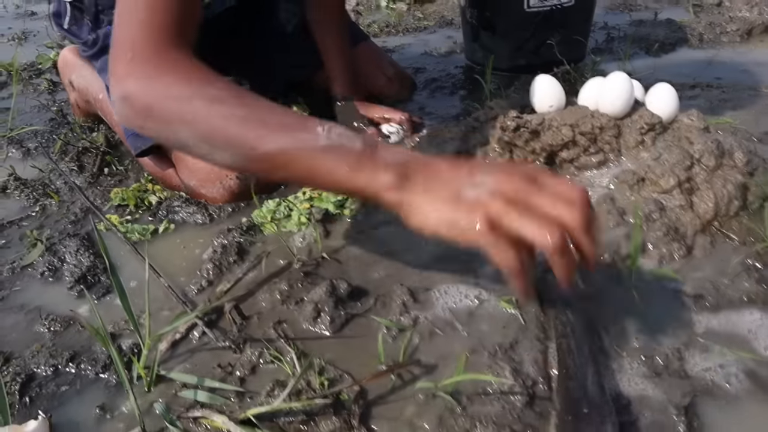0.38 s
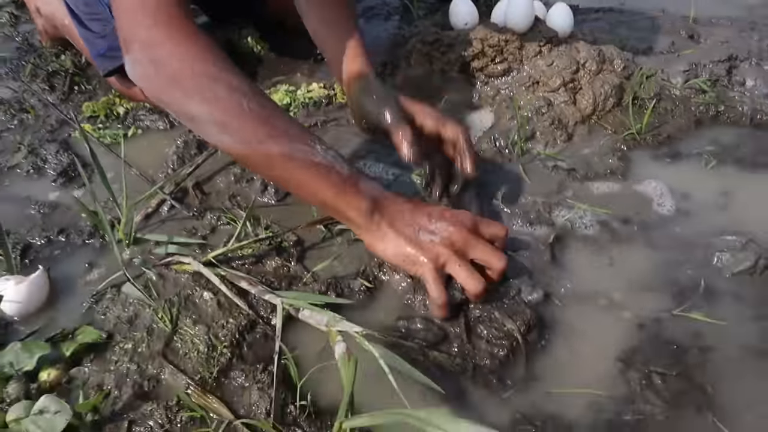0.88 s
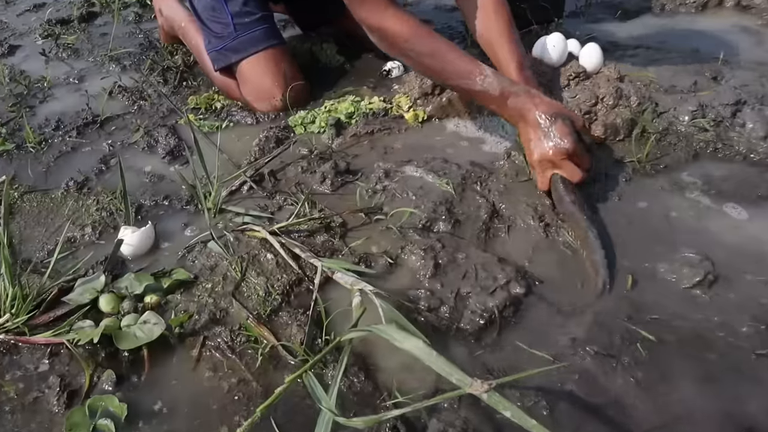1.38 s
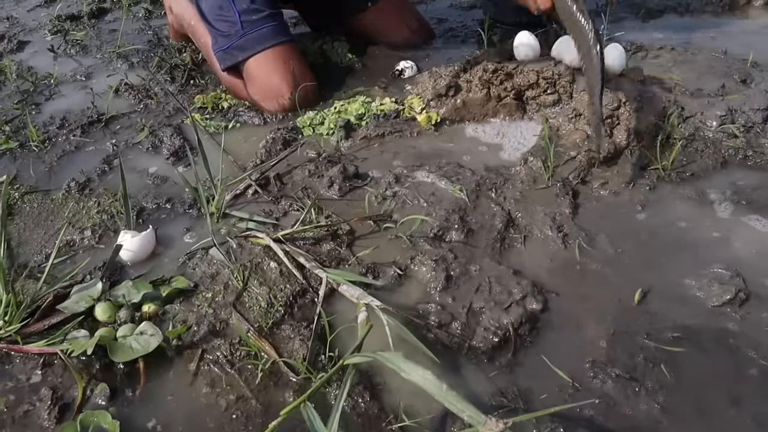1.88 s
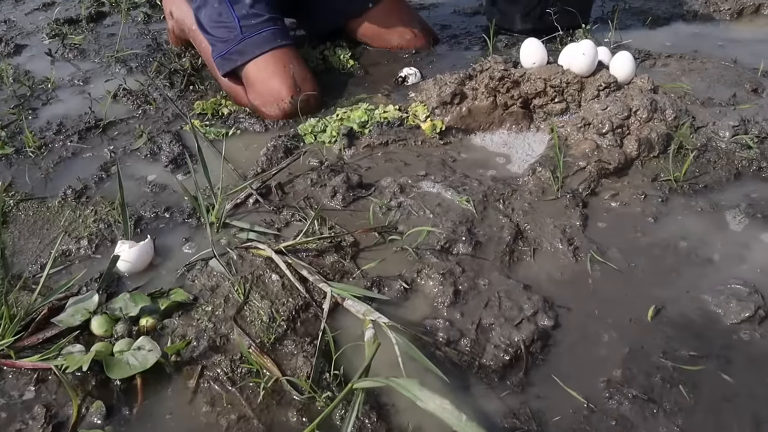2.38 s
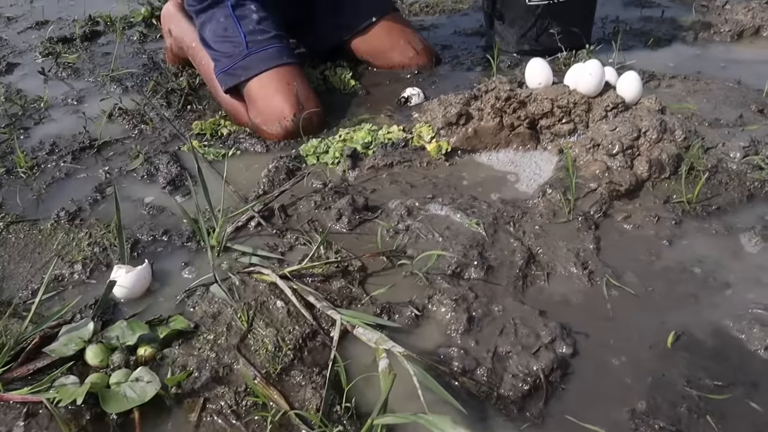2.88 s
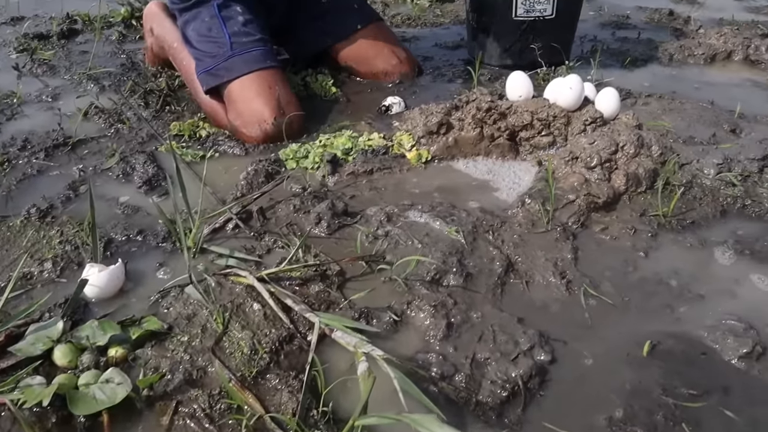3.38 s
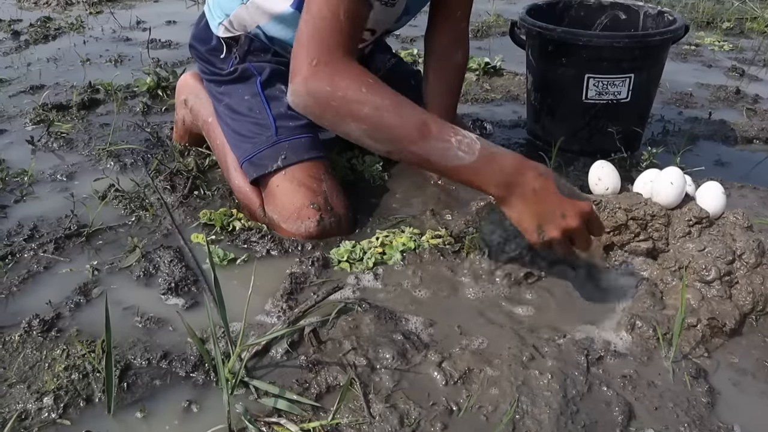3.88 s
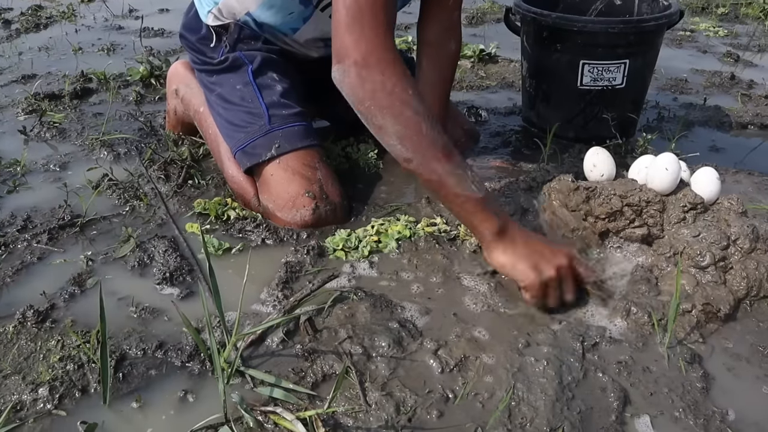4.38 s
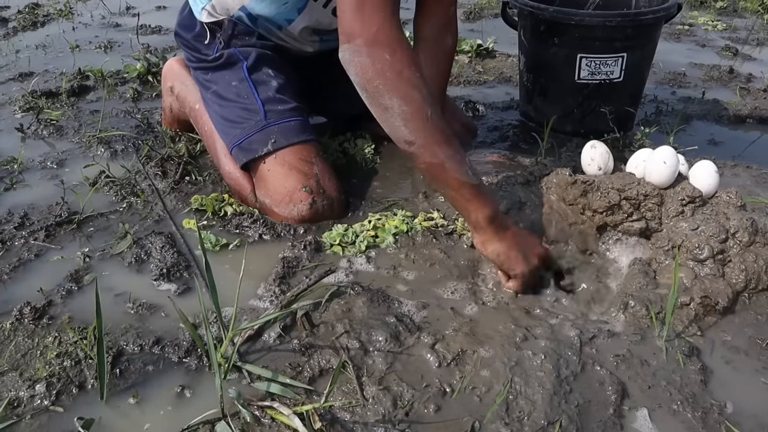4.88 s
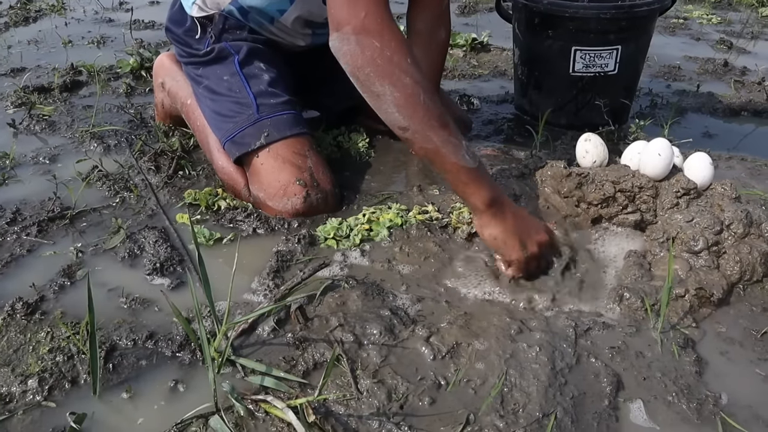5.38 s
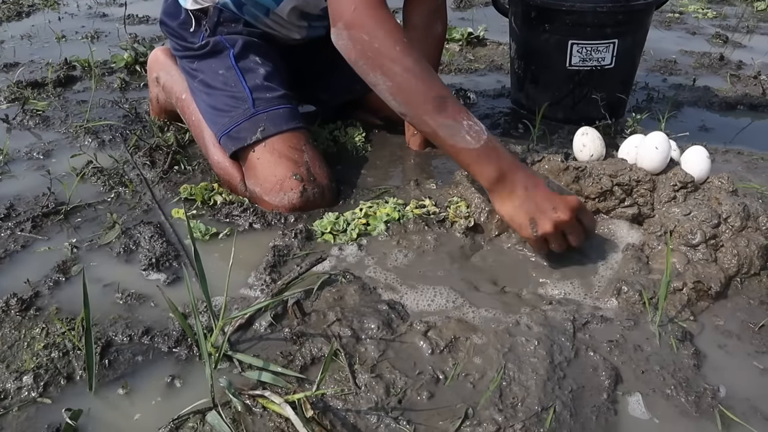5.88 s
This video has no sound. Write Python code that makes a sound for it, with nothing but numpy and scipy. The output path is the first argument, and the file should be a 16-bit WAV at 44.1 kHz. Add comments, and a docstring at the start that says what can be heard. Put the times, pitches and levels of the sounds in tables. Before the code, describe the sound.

Busy wet smacks and splashes for about a second and a half, then near quiet with soft low wind buffeting. Around three seconds, heavy dull thumps ring a plastic pail with wet slaps. From nearly four seconds, slower rhythmic stirring brings bubbling plops and squelchy slaps. Open field, dry, close microphone, wide splash treble, faint hiss and drone.

```python
"""Water and mud splash as a hand grabs a slippery fish, drops it in a bucket and stirs a water-filled hole.
The water is crowds of tiny ringing bubbles plus flickering noise; each smack is a noise burst ringing a cavity.
Trapped air gulps as rising sines, the bucket rings in several modes, and a few thin whistles glide.
Low noise makes the wind on the microphone, with a few thuds, a faint far drone and an open-field hiss.
The two microphone ports are spread wide in the treble."""
import sys
import numpy as np
from scipy import signal
from scipy.fft import rfft, irfft
from scipy.io import wavfile

SR = 44100
rng = np.random.default_rng(int(sys.argv[2]) if len(sys.argv) > 2 else 0)


def put_to_file(sound):
    """Save the sound as 16-bit audio at rate SR, in the file named by the first command-line argument."""
    columns = np.atleast_2d(sound).T  # one column per channel
    safe = np.clip(columns, -1, 1)
    whole_steps = np.round(safe * 32767)
    wavfile.write(sys.argv[1], SR, whole_steps.astype(np.int16))


def attenuation_scalar(level_db):
    """Turn a level in dB into a linear amplitude multiplier (20 dB per decade)."""
    decades = np.asarray(level_db, float) / 20
    return 10 ** decades


N = 264600   # six seconds of samples
FREQS = np.maximum(np.fft.rfftfreq(N, 1 / SR), 1)


def rms_one(x):
    """Scale to an average strength (rms) of 1."""
    return x / np.sqrt(np.mean(x ** 2) + 1e-20)


def in_time(rows):
    """Turn table columns into signals, joined by straight lines and held outside the table."""
    s, *columns = np.transpose(rows)
    return np.array([np.interp(np.arange(N) / SR, s, c) for c in columns])


def at_hz(points):
    """Read a table over frequency at every bin of the spectrum."""
    hz, value = np.transpose(points)
    return np.interp(np.log(FREQS), np.log(hz), value)


def band(x, low_hz, high_hz, count=1):
    """Keep a band of pitches with a Butterworth filter, applied count times."""
    edges = [low_hz, min(high_hz, .45 * SR)]
    sections = signal.butter(2, edges, "band", fs=SR, output="sos")
    return signal.sosfilt(np.tile(sections, (count, 1)), x)


def lowpass(x, order, top_hz):
    """Take away the treble above top_hz."""
    return signal.sosfilt(signal.butter(order, top_hz, fs=SR, output="sos"), x)


def drift(rate):
    """Slow random wandering with a spread of 1; a higher rate (Hz) wanders faster."""
    # smooth noise is made at every 40th sample, then filled in
    r = np.exp(-80 * np.pi * rate / SR)
    slow = signal.lfilter([1], [1, -2 * r, r * r], rng.standard_normal(N // 40 + 2002))[2000:]
    return np.interp(np.arange(N) / 40, np.arange(len(slow)), rms_one(slow))


def ring(x, hz, t60):
    """A resonance: a unit click sets a sine of height 1 ringing, down 60 dB after t60 seconds."""
    r = attenuation_scalar(-60 / (t60 * SR))
    w = 2 * np.pi * min(hz, .45 * SR) / SR
    return signal.lfilter([0, np.sin(w)], [1, -2 * r * np.cos(w), r * r], x + 1e-18)


def add(out, s, sound):
    """Mix a short sound in at time s."""
    i = round(s * SR)
    out[i:i + len(sound)] += sound[:N - i]


def coloured(spectrum):
    """Steady noise of a given spectrum, rms 1."""
    return rms_one(irfft(rfft(rng.standard_normal(N)) * attenuation_scalar(at_hz(spectrum)), N))


# spectra of the open-air hiss, shared and opposite in the ports: (pitch [Hz], relative level per Hz [dB])
FIELD_SHARED = [(88, -10.5), (150, -14.5), (244, -12.5), (504, -10.5), (1240, -19), (1940, -18.5),
                (8230, -34.5), (11300, -31), (12700, -31), (16000, -110)]
FIELD_OPPOSITE = [(18, -99), (30, -77), (75, -64), (194, -4), (666, -2.5), (2610, -6), (6210, -16.5),
                  (11400, -14.5), (14000, -20), (16000, -80)]


def field():
    """Open-air hiss, mid and side: coloured noise whose treble comes and goes."""
    mid = attenuation_scalar(-54 + 0.47 * drift(1.8)) * coloured(FIELD_SHARED)
    side = attenuation_scalar(-50.5 + 2.4 * drift(1.5)) * coloured(FIELD_OPPOSITE)
    hiss = np.array([mid, side])
    treble_gain = attenuation_scalar(2.5 * drift(5) - 1.2)
    return hiss + (treble_gain - 1) * band(hiss, 4000, 15000)


def drone():
    """A faint far drone, perhaps a pump: a narrow band of noise that wavers slowly."""
    noise = band(rng.standard_normal(N), 115, 141)
    return attenuation_scalar(-60 + 1.5 * drift(1.5)) * rms_one(noise)


# strength of the wind on the ports: (time [s], level [dB], buffeting relative to level [dB])
WIND_GUSTS = [(0.0, -43, -10), (1.12, -39, -13), (1.22, -54, -7), (1.37, -35.5, -13), (1.52, -40.5, 5.5),
              (1.57, -57, 6), (1.74, -42, -18), (1.9, -55, -1), (2.19, -51.5, -3.5), (2.26, -39, -11.5),
              (2.57, -58, -0.5), (2.87, -41, -18), (3.0, -57, 6), (3.51, -45, 3), (3.61, -47, -12),
              (3.88, -41.5, -12), (3.94, -55.5, -0.5), (4.21, -40.5, -15), (4.3, -47, -8),
              (5.4, -44.5, -12), (6.0, -48.5, -7)]
# colour of its low rumble: (pitch [Hz], relative level per Hz [dB])
WIND_SPECTRUM = [(12, -94), (20, -51), (29, 4), (55, 23.5), (75, 23.5), (110, 21), (140, 7), (240, -120)]


def wind():
    """Air tumbling over the ports: lumpy low noise, plus buffeting about an octave higher."""
    level_db, buffet_db = in_time(WIND_GUSTS)
    rumble = attenuation_scalar(level_db + 1.6 * drift(13)) * coloured(WIND_SPECTRUM)
    buffet = rms_one(band(band(rng.standard_normal(N), 92, 225), 83, 215))
    return rumble + attenuation_scalar(level_db + buffet_db + 1.2 * drift(9.9)) * buffet


# gain of the wind that differs between the ports: (time [s], level [dB])
WIND_DIFFERENCE = [(0, -16), (1.2, -12), (1.5, 2), (1.6, -48), (3.6, -42), (3.8, -12), (6, -15)]


def wind_apart():
    """The part of the wind that differs between the ports: a fresh draw, without the lowest rumble."""
    gain_db, = in_time(WIND_DIFFERENCE)
    return attenuation_scalar(gain_db) * band(wind(), 83, 400)


# low thuds at the end of a gust: (time [s], level before the soft onset [dB], pitch [Hz], 60 dB fall [s])
GUST_THUDS = [(1.489, -27, 130, 0.071), (1.496, -25, 200, 0.055), (1.514, -31, 260, 0.039)]


def thuds():
    """Short dull rings: low sines with a soft start that die away."""
    out, t = np.zeros(N), np.arange(6000) / SR
    for s, db, hz, t60 in GUST_THUDS:
        onset = 1 - np.exp(-t / 0.0023)
        add(out, s, attenuation_scalar(db - 60 * t / t60) * onset * np.sin(2 * np.pi * hz * t))
    return out


# thin whistles: (start [s], end [s], first pitch [Hz], last pitch [Hz], level [dB])
THIN_WHISTLES = [(0.749, 0.817, 4130, 4280, -45.5), (0.866, 0.903, 3950, 3880, -42.5),
                 (0.898, 0.938, 1960, 2090, -47)]


def whistles():
    """Short gliding sines with soft ends."""
    out = np.zeros(N)
    for start, end, first_hz, last_hz, db in THIN_WHISTLES:
        size = round((end - start) * SR)
        turns = np.cumsum(np.linspace(first_hz, last_hz, size)) / SR
        add(out, start, attenuation_scalar(db) * signal.windows.tukey(size, .5) * np.sin(2 * np.pi * turns))
    return out


# fish against the bucket: (time [s], peak level [dB], hardness [Hz], signed drive of the twin mode [ratio],
# share of the free ring time [ratio])
FISH_THUMPS = [(2.814, -35, 400, 0.52, 0.53), (2.946, -5.5, 636, 0.11, 0.85),
               (3.149, -24, 406, -0.57, 0.31), (3.3655, -8, 238, -1.23, 1.0),
               (3.484, -17.5, 900, 0.12, 0.26), (3.4886, -19, 120, -.3, 0.27),
               (3.498, -20.5, 250, 0.53, 0.33), (3.558, -27.5, 603, -0.68, 0.26)]
# ways the bucket wall rings: (pitch [Hz], level of drive [dB], free 60 dB fall [s])
WALL_MODES = [(140, -13.5, 0.087), (295, -0.5, 0.13), (600, -16, 0.089), (678, -5, 0.085), (960, -7, 0.09),
              (1400, 0, .03), (1990, -18, .03)]
TWIN_HZ, TWIN_T60_S = 333.5, 0.097   # a close second mode that beats against the main one
SCUFF_DB, SCUFF_T60_S = -18, .04   # rough contact of the wet body on the wall, relative to the push


def bucket():
    """Soft blows, each a rounded push, set the wall modes ringing; a body left lying on the wall damps them."""
    out, t = np.zeros(N), np.arange(8000) / SR
    for s, db, hardness_hz, twin, free in FISH_THUMPS:
        push = t * np.exp(-2 * np.pi * hardness_hz * t)
        scuff = attenuation_scalar(SCUFF_DB - 60 * t / SCUFF_T60_S) * rng.standard_normal(len(t))
        blow = push / push.max() + scuff
        wall = sum(attenuation_scalar(level_db) * ring(blow, hz, free * t60) for hz, level_db, t60 in WALL_MODES)
        wall = wall + twin * ring(blow, TWIN_HZ, free * TWIN_T60_S)
        wall = band(wall, 157, 7300)
        add(out, s, attenuation_scalar(db) * wall / np.abs(wall).max())
    return out


WASH_DB, WASH_LINGER_S, WASH_PATCHY_DB = -13, .012, 4.0   # relative to fizz, time constant, flicker
WASH_EDGES_HZ = [800, 1300, 2100, 3300, 5200]


def wash(fizz):
    """Sheets of water running back: noise that lingers after the surge, each band flickering on its own."""
    r = np.exp(-1 / (WASH_LINGER_S * SR))
    flow = signal.lfilter([1 - r], [1, -r], fizz)
    white = rng.standard_normal((2, N))
    sheets = 0
    for k, (low_hz, high_hz) in enumerate(zip(WASH_EDGES_HZ, WASH_EDGES_HZ[1:])):
        flicker = attenuation_scalar(WASH_PATCHY_DB * drift(35) - 1.5 * k)   # higher bands are weaker
        sheets = sheets + rms_one(band(white[k % 2], low_hz, high_hz)) * flicker
    return attenuation_scalar(WASH_DB) * flow * rms_one(sheets)


def at_random(fizz, top_db, range_db, low_hz, high_hz, count):
    """Times, levels from top_db over the fizz down by range_db, pitches, and a spare draw from 0 to 1."""
    when, size, pitch, spare = rng.random((count, 4)).T
    s = when * (N - 200) / SR
    fizz_db = 20 * np.log10(fizz[(s * SR).astype(int)])
    return s + .002, fizz_db + top_db - range_db * size, low_hz * (high_hz / low_hz) ** pitch, spare


def blips(fizz):
    """Rows of lesser gulps: small pockets that close at random, as strong as the fizz of the moment allows."""
    s, db, hz, climb = at_random(fizz, top_db=13.5, range_db=10, low_hz=1200, high_hz=4200, count=260)
    return list(zip(s, db, hz, 70 / hz, 28 * climb))   # 70 cycles rung, rising up to 28 octaves per s


# air pockets that ring as they close: (time [s], level before onset and flutter [dB], early pitch [Hz],
# 60 dB fall [s], rise [octaves per s])
AIR_GULPS = [(.094, -22.5, 1064, .082, 11), (.128, -20, 800, .025, 6), (.138, -16, 1035, .023, 7),
             (.154, -17, 858, .06, 0), (.171, -6, 520, .025, 7), (.186, -10, 493, .02, 10),
             (.293, -16, 1457, .043, 7), (.304, -20, 680, .025, 6), (.345, -30, 420, .09, 6),
             (.388, -16, 990, .047, 9), (.6, -17, 500, .015, 10), (.637, -14.5, 648, .033, 6),
             (1.168, -15, 510, .027, 7), (1.209, -8, 680, .02, 7), (1.257, -14.5, 1700, .042, 7),
             (1.286, -20, 700, .04, 4), (1.324, -24, 620, .03, 6), (1.392, -16, 1865, .024, 4),
             (3.829, -20, 820, .04, 3), (3.897, -26, 1450, .04, 5), (3.929, -19, 2200, .03, 2),
             (3.957, -28, 950, .03, 5), (3.854, -12.5, 746, .033, 5), (3.909, -40, 700, .12, 13),
             (3.929, -33, 931, .11, 8), (3.969, -30.5, 918, .088, 8.5), (4.237, -23, 1400, .021, 15.5),
             (4.267, -36, 900, .083, 12), (4.285, -33, 1300, .08, 10), (4.335, -44, 1150, .15, 18),
             (4.454, -20.5, 1340, .042, 8), (4.467, -16.5, 941, .06, 13), (4.528, -28, 1850, .04, 4),
             (4.567, -24, 1500, .043, 20), (4.584, -22, 1800, .03, 6), (4.617, -27, 3400, .03, 2),
             (4.658, -30, 950, .05, 15), (4.753, -12, 950, .022, 7), (4.971, -22, 1000, .03, 8),
             (5.044, -29, 544, .08, 14), (5.077, -12, 1705, .035, 15), (5.078, -25, 2300, .02, 15),
             (5.504, -13, 1356, .026, 12), (5.516, -21, 527, .074, 6), (5.549, -29, 1150, .11, 22),
             (5.599, -34, 1560, .065, 4.4), (5.679, -37, 1300, .07, 9), (5.867, -18.5, 844, .06, 4),
             (5.884, -15.5, 1083, .029, 10), (5.918, -32, 650, .03, 12), (5.942, -22, 640, .095, 24),
             (5.957, -32, 2050, .04, 5)]
GULP_WAVER, GULP_FLUTTER_DB = .016, 1.5   # unevenness of pitch (share) and level


def gulps(rows):
    """A pocket near the surface rings as a sine that climbs, unevenly, while the water over it thins."""
    out, t = np.zeros(N), np.arange(5000) / SR
    flutter, waver = drift(110), np.tile(drift(90), 2)
    for s, db, hz, t60, rise in rows:
        climb = 2 ** (rise * (np.minimum(t, .08) - .012))   # the pitch hz is passed 12 ms after the start
        pitch = hz * climb * (1 + GULP_WAVER * waver[int(s * SR):][:len(t)])
        level = attenuation_scalar(db - 60 * t / t60) * (1 - np.exp(-t / 0.0024))
        add(out, s - .001, level * np.sin(2 * np.pi * np.cumsum(pitch) / SR))
    return out * attenuation_scalar(GULP_FLUTTER_DB * flutter)


def patter(fizz):
    """Rows of lesser smacks at random, their level following the fizz of the moment."""
    s, db, hz, edge = at_random(fizz, top_db=11, range_db=12, low_hz=1600, high_hz=4500, count=170)
    return list(zip(s, db, hz, -14 + 16 * (edge - .5)))   # crack 22 to 6 dB below the peak


# the clear smacks of water and mud: (time [s], peak level of the body [dB], cavity pitch [Hz],
# bright crack relative to that peak [dB])
CLEAR_SMACKS = [(0.0862, -20, 2110, -10.5), (0.105, -14, 7100, -26), (0.115, -21, 2410, -8),
                (0.1521, -25, 1020, -3), (0.1738, -11, 5000, -3.5), (0.2003, -20, 4260, -19),
                (0.2606, -14, 1550, 0.5), (0.2925, -11, 1520, -24), (0.3035, -17, 3510, -6),
                (0.3254, -26, 3500, -14), (0.3889, -17.5, 2120, -8), (0.4254, -20.5, 3820, -17),
                (0.4721, -24.5, 2280, -24), (0.4813, -26.5, 1530, -6), (0.513, -15, 2560, -34),
                (0.6244, -20, 2130, -35), (0.6377, -14, 3120, -15), (0.6515, -21.5, 3860, 3.5),
                (0.6653, -24, 4000, 8.5), (0.684, -20.5, 2730, -5), (0.7218, -28.5, 3680, 1),
                (0.8373, -24, 5130, -5.5), (0.867, -14.5, 4420, -0.5), (0.9897, -19, 4120, -22),
                (1.031, -20, 3740, -11), (1.0794, -15.5, 1850, -14), (1.0887, -21, 4140, -15),
                (1.1026, -13.5, 1700, -16), (1.1405, -15, 1960, -12), (1.1524, -12, 2500, -21),
                (1.1606, -18, 2830, -20), (1.1867, -16, 2240, 2.5), (1.193, -7, 1780, -5),
                (1.279, -6, 2330, -10), (1.438, -25.5, 7200, -4), (2.0428, -39, 4850, 4),
                (2.0601, -34.5, 2270, -7), (2.1165, -36.5, 2140, -15), (2.731, -25.5, 3400, -4.5),
                (2.786, -25.5, 5150, -11), (2.8518, -26.5, 6300, -1), (2.9187, -25.5, 3500, 0.5),
                (2.9446, -5, 2600, -3), (2.9946, -32.5, 1710, -3), (3.023, -40, 4800, 0),
                (3.079, -42, 7000, 0), (3.3651, -13, 1475, -25), (3.4233, -20.5, 1900, -7),
                (3.4398, -24.5, 1760, -12), (3.4839, -22.5, 1740, -20), (3.5168, -18, 1880, -8),
                (3.5604, -25, 1900, -21), (3.575, -26.5, 1140, -20), (3.761, -40, 6090, 3.5),
                (3.8196, -24.5, 4290, -16), (3.831, -14, 1760, -26), (3.854, -18, 2530, -8),
                (4.0032, -28, 1420, -9), (4.0902, -27.5, 2130, -31), (4.1256, -35, 2090, -7),
                (4.2378, -21.5, 1380, -11), (4.2544, -22.5, 2250, -4), (4.309, -17.5, 2250, -21),
                (4.3938, -8.5, 1870, -22), (4.4072, -16.5, 1670, -28), (4.455, -17, 1320, -15),
                (4.483, -13, 3280, -29), (4.574, -18, 2800, -2.5), (4.6125, -24.5, 5230, -3),
                (4.6475, -20, 2630, -23), (4.6576, -25, 2400, -2), (4.7215, -24, 2020, -17),
                (4.7444, -20.5, 5030, -6), (4.7547, -15, 2790, -5.5), (4.7917, -29, 3700, -18),
                (4.806, -22, 2130, -11), (4.8354, -11.5, 2230, -8), (4.848, -21, 1740, -20),
                (4.9705, -18, 1900, -12), (4.9985, -27, 1600, -19), (5.0313, -22, 1920, -13),
                (5.076, -23.5, 1660, -12), (5.1195, -30.5, 1710, -7.5), (5.1544, -27, 1770, -10),
                (5.1722, -28, 1900, 0), (5.2153, -29, 1750, -9), (5.297, -26.5, 1060, -1),
                (5.3341, -21.5, 2220, -22), (5.3963, -34.5, 2370, -12), (5.448, -32, 2670, 3.5),
                (5.4575, -27.5, 7440, -1.5), (5.4828, -30.5, 1770, -11), (5.4956, -22, 1920, -23),
                (5.5048, -18, 1330, -30), (5.5164, -19, 1560, -24), (5.5652, -15, 2040, -30),
                (5.588, -9, 2780, -25), (5.6592, -19.5, 2460, -8), (5.769, -17.5, 2240, -14),
                (5.7933, -17, 2700, -12), (5.831, -32, 3300, -6), (5.866, -20.5, 2310, -9),
                (5.8938, -21, 1010, -26), (5.9402, -20, 1100, -27)]


def smacks(rows):
    """A snap and a dying burst of noise ring the cavity left behind and crack brightly; hard ones last longer."""
    out, t = np.zeros(N), np.arange(2000) / SR
    for s, db, hz, crack_db in rows:
        fall_s = 0.019 * attenuation_scalar(0.027 * db)   # time to fall by 60 dB
        fall = (1 - np.exp(-t / 0.0009)) * attenuation_scalar(-60 * t / fall_s)
        burst, spit = rng.standard_normal((2, len(t))) * fall
        burst[12] += 1.5   # the snap of the film breaking
        cavity = rms_one(ring(burst, hz, 36.0 / hz))
        body = cavity + 1.01 * rms_one(band(burst, 0.5 * hz, 1.5 * hz))
        body = band(body, 0.42 * hz, 1.9 * hz)
        body = body / np.abs(body).max()
        crack = band(spit, 3000, 13000, count=2)
        crack = crack / np.abs(crack).max()
        add(out, s - .0003, attenuation_scalar(db) * (body + attenuation_scalar(crack_db) * crack))
    return out


# surges of churned water, one per stroke of hand or tail: (crest time [s], fizz gain [dB], slosh gain [dB],
# spray gain [dB], time to build by 20 dB [s], time to fade by 20 dB [s])
WATER_SURGES = [(.002, -35, -70, -46, .02, .035), (.075, -45, -56, -50, .03, .1),
                (.175, -25, -23, -37, .09, .06), (.25, -31, -40, -43, .08, .22),
                (.39, -36, -41, -46, .1, .08), (.485, -38, -50, -48, .06, .12),
                (.655, -34, -35, -40, .02, .08), (.789, -36, -38.5, -41, .025, .05),
                (.926, -39, -38, -43, .06, .04), (1.033, -36.5, -39, -36, .03, .05),
                (1.091, -29, -32.5, -35.5, .03, .045), (1.197, -28, -38, -27, .08, .05),
                (1.28, -35.5, -35.5, -41, .06, .11), (1.374, -33.5, -50, -42, .06, .13),
                (2.801, -47, -54, -52, .09, .16), (2.92, -48, -55, -51, .06, .03),
                (2.947, -23, -17, -40, .004, .022), (2.975, -54, -43, -57, .02, .07),
                (3.325, -48, -61, -46, .02, .025), (3.433, -36, -40, -44, .04, .025),
                (3.519, -51, -42.5, -65, .05, .11), (3.688, -48, -56, -51, .12, .13),
                (3.84, -32, -34, -50, .016, .15), (4.01, -41.5, -60, -62, .08, .025),
                (4.172, -70, -73, -47, .015, .08), (4.247, -49, -52, -60, .06, .08),
                (4.31, -38, -58, -47, .08, .035), (4.402, -28, -55.5, -39, .03, .035),
                (4.482, -38, -37, -56, .06, .045), (4.579, -33, -65, -37.5, .09, .08),
                (4.664, -30.5, -50, -39, .035, .04), (4.751, -34.5, -66, -39, .045, .09),
                (4.843, -38, -53, -47, .06, .07), (4.966, -34, -70, -43, .075, .05),
                (5.078, -40, -42, -54.6, .022, .085), (5.187, -40, -62, -45, .08, .07),
                (5.304, -39.5, -55, -56, .028, .12), (5.51, -39, -36, -53, .065, .06),
                (5.583, -31, -55, -57, .055, .06), (5.67, -38, -44, -39, .02, .08),
                (5.782, -43, -70, -49, .06, .09), (5.881, -38, -46, -43, .04, .055),
                (5.99, -41, -48, -55, .1, .1)]
CREST_ROUNDING = 1.2   # 1 is a sharp crest with even slopes in dB; more holds the crest, then drops faster


def motion():
    """Gains of fizz, slosh and spray: each surge builds, crests and fades."""
    out = np.full((3, N + SR), 1e-7)
    for s, *crest_dbs, build_s, fade_s in WATER_SURGES:
        near = np.arange(max(round((s - .3) * SR), 0), round((s + .6) * SR))
        late = near / SR - s
        drop_db = -20 * np.maximum(late / fade_s, -late / build_s) ** CREST_ROUNDING
        out[:, near] += attenuation_scalar(np.add.outer(crest_dbs, drop_db))
    return out[:, :N]


def droplets(low_hz, high_hz, per_s, cycles, rise, tilt_db, uneven_db, clump_db, hiss):
    """Random bubbles ring some cycles while their pitch climbs; they come in clumps, on a little hiss."""
    sizes = attenuation_scalar(uneven_db * np.minimum(rng.exponential(1, N), 4)) * rng.choice([-1, 1], N)
    born = rng.random(N) < per_s * attenuation_scalar(clump_db * drift(30)) / SR
    dealt = rng.integers(0, 11, N)   # which of eleven pitches each bubble gets
    rings = 0
    for k, hz in enumerate(np.geomspace(low_hz, high_hz, 11)):
        turns = np.arange(int(cycles * SR / hz) + 8) * hz / SR
        level = attenuation_scalar(tilt_db * np.log2(hz / low_hz) - 60 * turns / cycles)
        bubble = level * np.sin(2 * np.pi * turns * (1 + rise * turns / cycles))
        rings = rings + signal.oaconvolve(sizes * born * (dealt == k), bubble)[:N]
    noise = rms_one(band(rng.standard_normal(N), low_hz, high_hz)) * attenuation_scalar(clump_db * drift(60))
    return rms_one(rms_one(rings) + hiss * noise)


def churn(gains):
    """Big slow bubbles slosh, small ones fizz, the finest spray crackles."""
    fizz = droplets(1277, 4064, per_s=480, cycles=42.8, rise=0.37, tilt_db=3.0,
                    uneven_db=3.5, clump_db=3.2, hiss=0.24)
    slosh = droplets(448, 1210, per_s=300, cycles=23.0, rise=0.33, tilt_db=5.8,
                     uneven_db=2.0, clump_db=3.73, hiss=0.32)
    spray = droplets(4400, 11740, per_s=2200, cycles=41.0, rise=0.3, tilt_db=-0.8,
                     uneven_db=5.0, clump_db=4.0, hiss=0.34)
    return (gains * [attenuation_scalar(-2.5) * fizz, slosh, spray]).sum(axis=0)


# width of the sound before it wavers: (pitch [Hz], side relative to mid [dB])
PORT_SPREAD = [(100, -36), (250, -39), (500, -9.5), (1000, -8.5), (2000, 1.9), (4000, 4.5), (8000, 5.5),
               (13000, 10)]
# how far the side leads, before its sign is flipped: (pitch [Hz], phase [radians])
PORT_LEAD = [(200, 2), (700, 0.63), (2400, 0.66), (5000, 0.6), (8000, 1.2), (13000, 1.4)]


def spread(x, extra_lead, wander):
    """The port difference is wide in the treble, led in phase; it wavers as each splash has its own spot."""
    turn = np.exp(1j * (at_hz(PORT_LEAD) + extra_lead))
    side = -irfft(rfft(x) * attenuation_scalar(at_hz(PORT_SPREAD)) * turn, N)
    return side * (0.64 + wander * drift(42)) + wander * drift(53) * band(x, 1100, 15000)


# when the hands are at the bucket: (time [s], share [0 to 1])
HANDS_AT_BUCKET = [(2.4, 0), (2.5, 1), (3.45, 1), (3.6, 0)]
STIRRING_FROM_S, STIRRING_TOP_HZ = 3.75, 12300   # slow stirring throws less fine spray: its top is duller


def scene():
    """Mid and side of all sources, turned into left and right."""
    gains = motion()
    fizz = gains[0]
    near = churn(gains) + wash(fizz) + whistles()
    near = near + smacks(CLEAR_SMACKS + patter(fizz)) + gulps(AIR_GULPS + blips(fizz))
    stirring = np.arange(N) >= STIRRING_FROM_S * SR
    near = np.where(stirring, lowpass(near, 3, STIRRING_TOP_HZ), near)
    away, = in_time(HANDS_AT_BUCKET)
    puddle = near * (1 - away)
    pail = near * away + bucket()
    mid = puddle + pail + wind() + thuds() + drone()
    side = spread(puddle, extra_lead=0, wander=0.38) + spread(pail, extra_lead=0.33, wander=0.18)
    side = side + wind_apart()
    mid, side = [mid, side] + field()
    return np.array([mid + side, mid - side])


def band_limit(x):
    """A steep low-pass at the top of the band."""
    return signal.sosfilt(signal.butter(12, 16330, fs=SR, output="sos"), x)


def record(dry):
    """The microphone's treble rolls off above 15.5 kHz and peaks beyond full scale are clipped."""
    dull = lowpass(dry, 6, 15500)
    return band_limit(np.clip(dull, -1, 1))


dry = scene()
out = record(dry)
put_to_file(out)
```